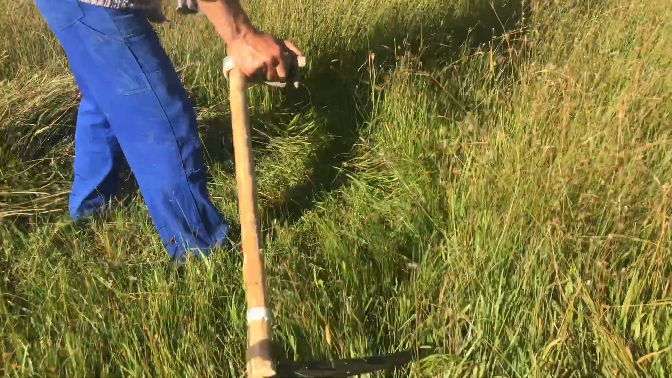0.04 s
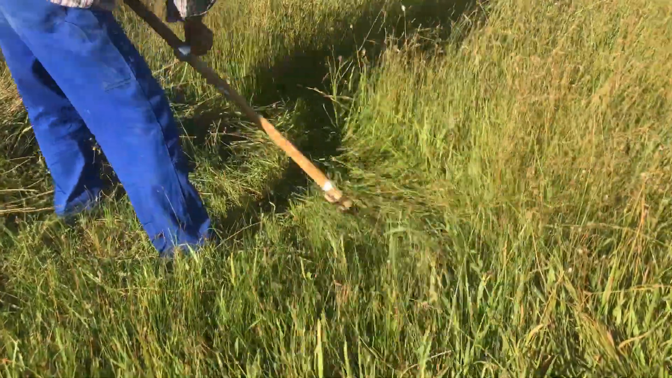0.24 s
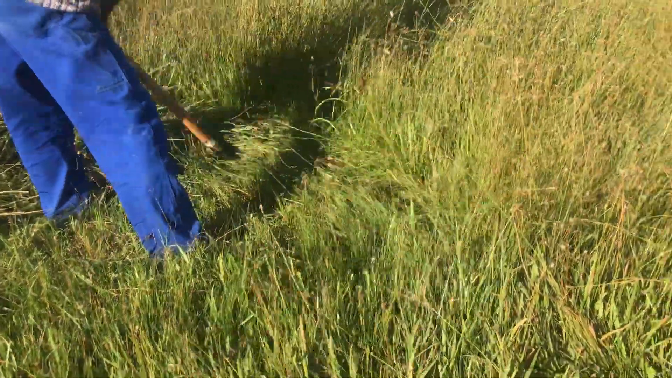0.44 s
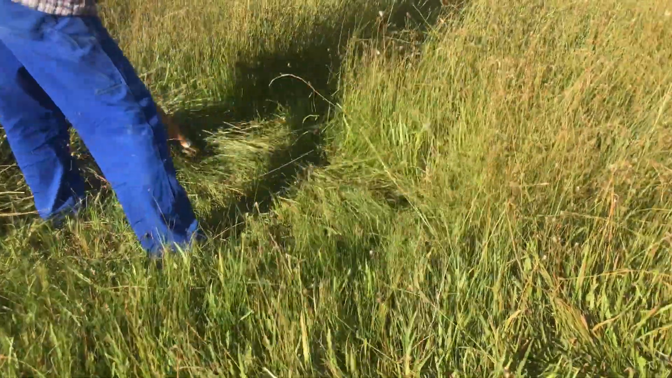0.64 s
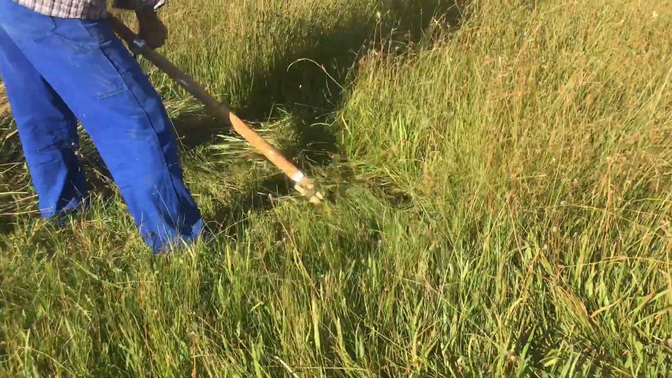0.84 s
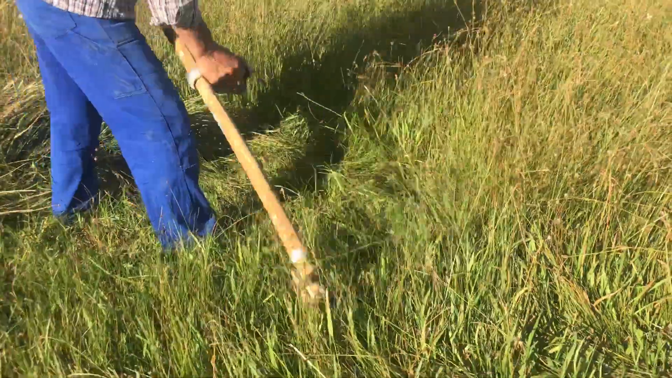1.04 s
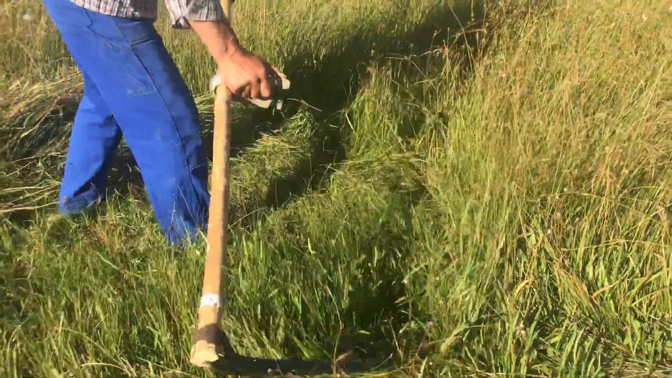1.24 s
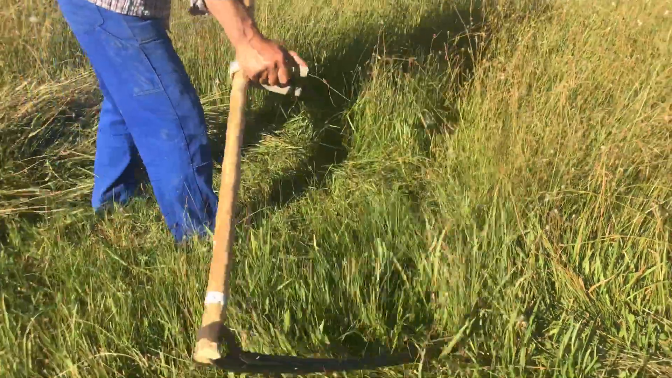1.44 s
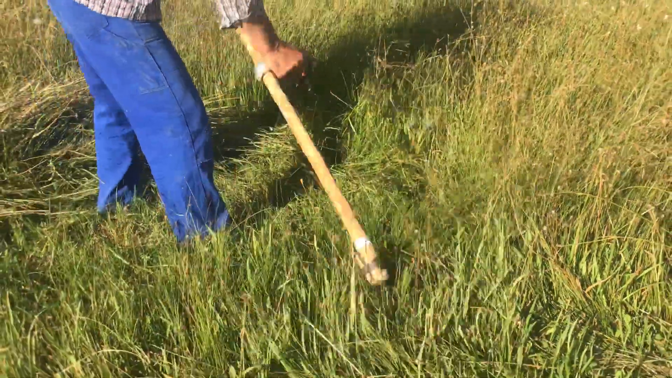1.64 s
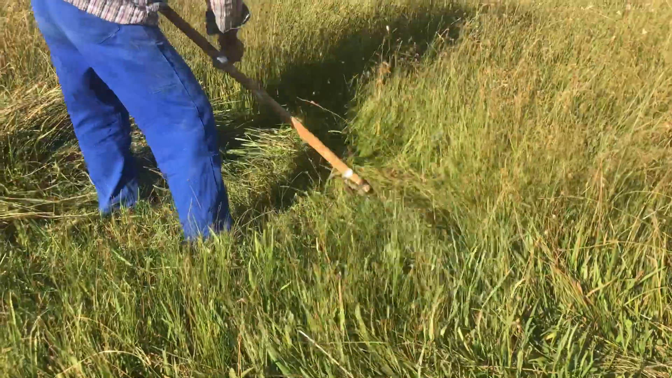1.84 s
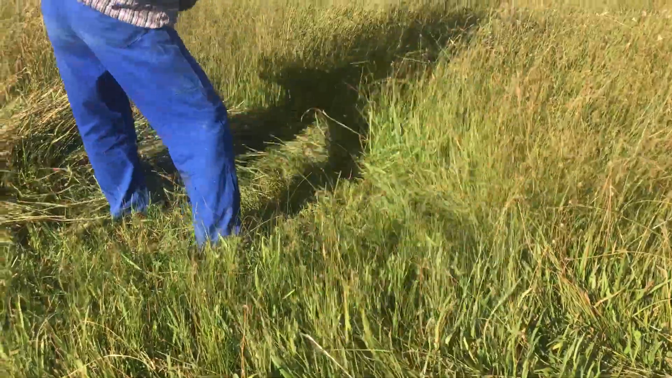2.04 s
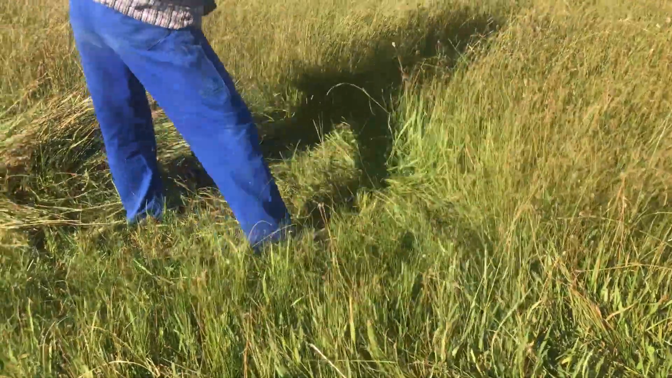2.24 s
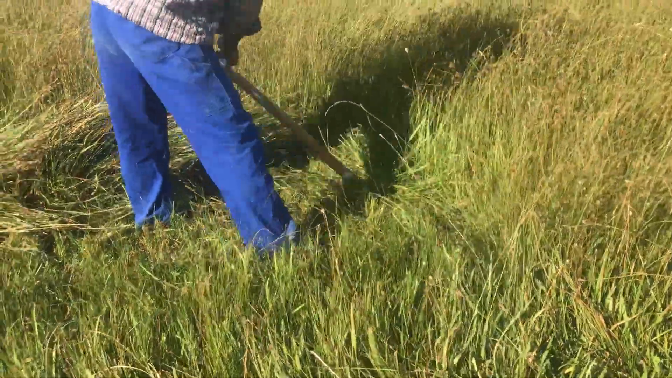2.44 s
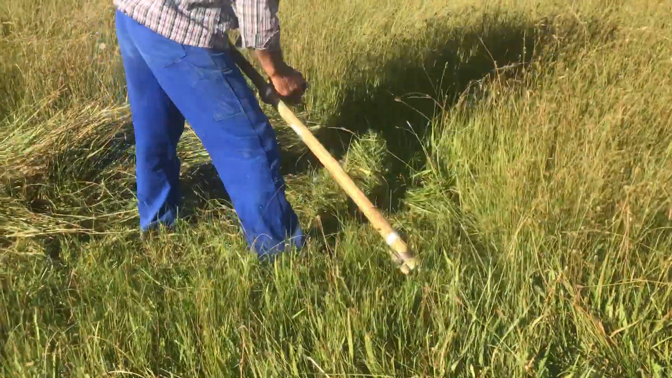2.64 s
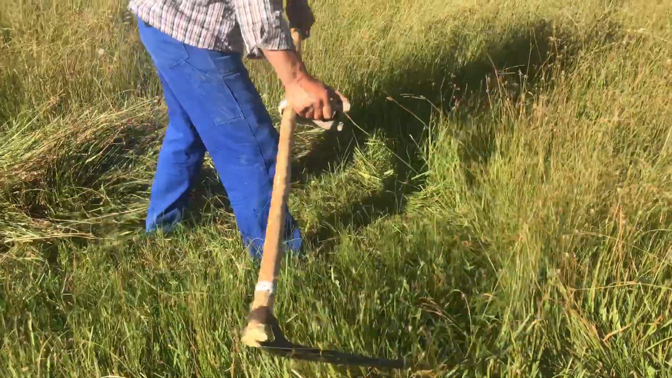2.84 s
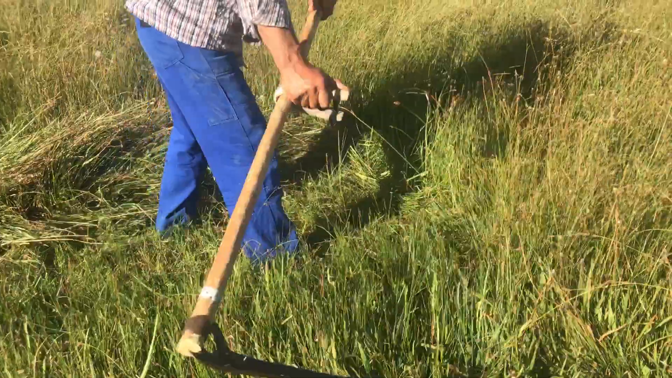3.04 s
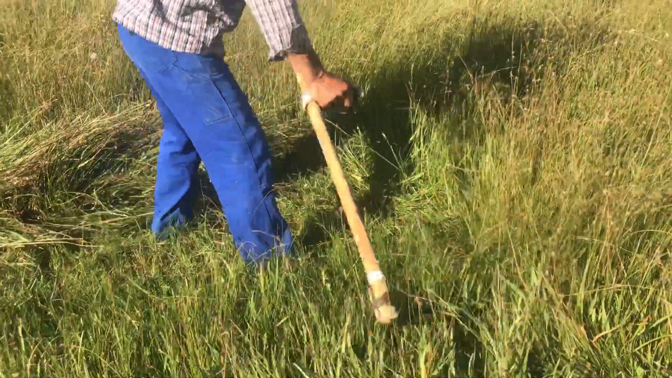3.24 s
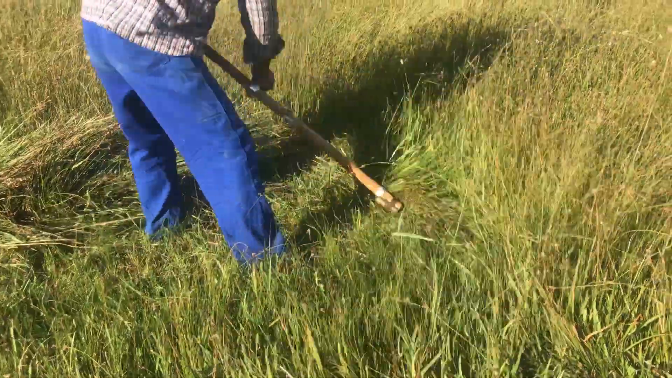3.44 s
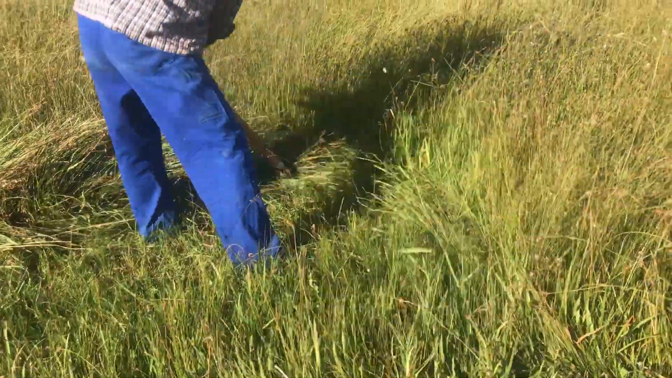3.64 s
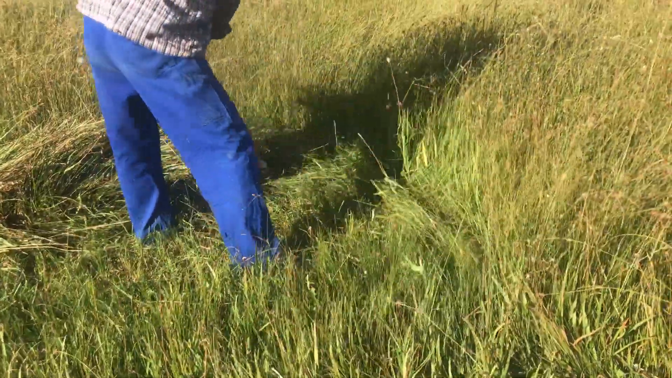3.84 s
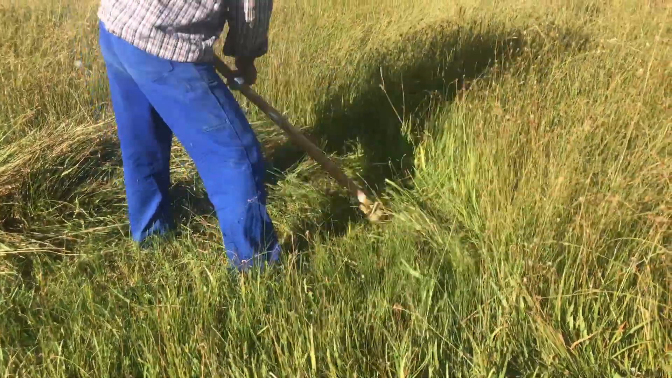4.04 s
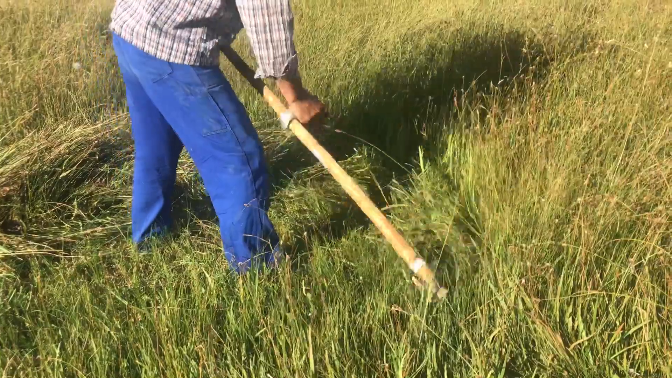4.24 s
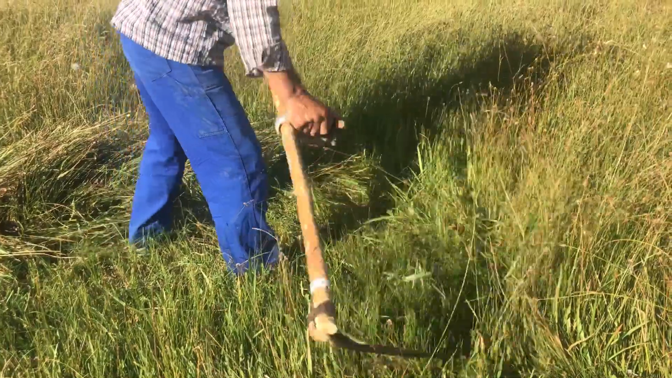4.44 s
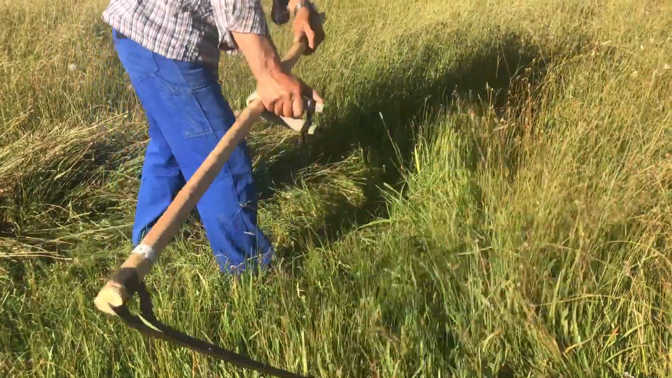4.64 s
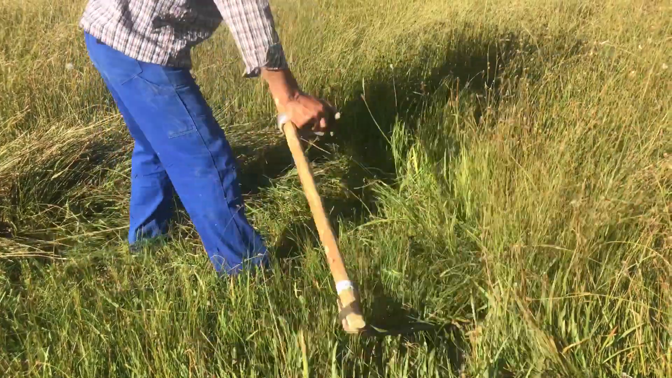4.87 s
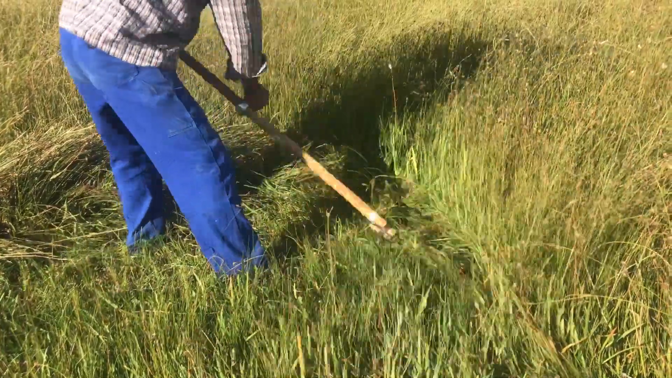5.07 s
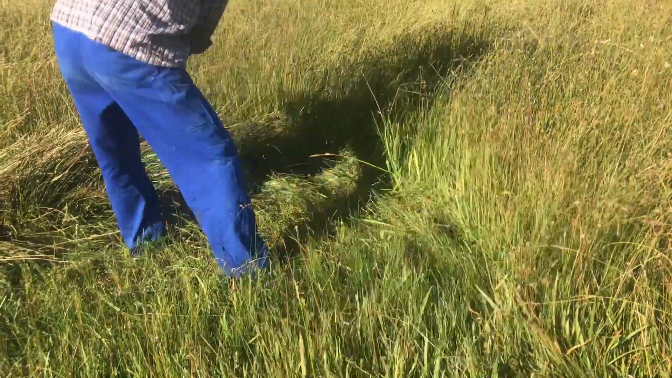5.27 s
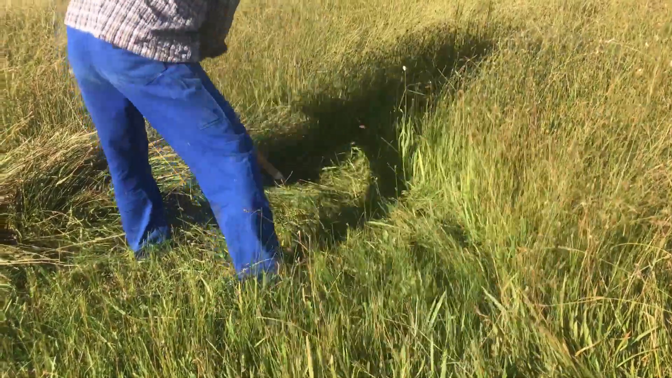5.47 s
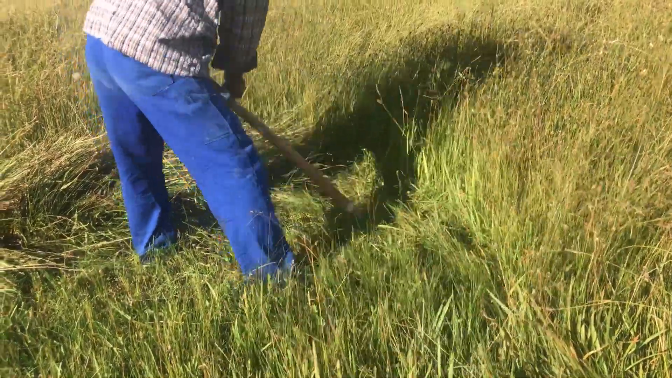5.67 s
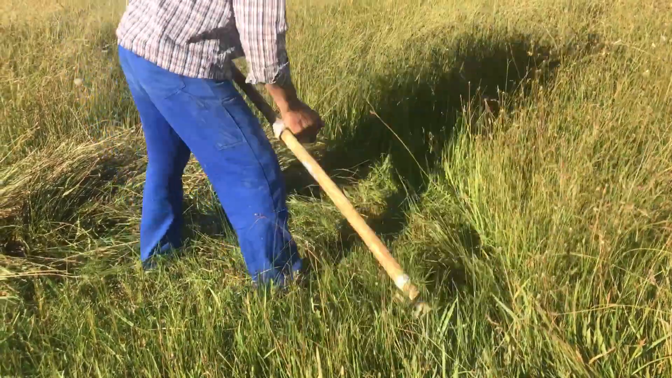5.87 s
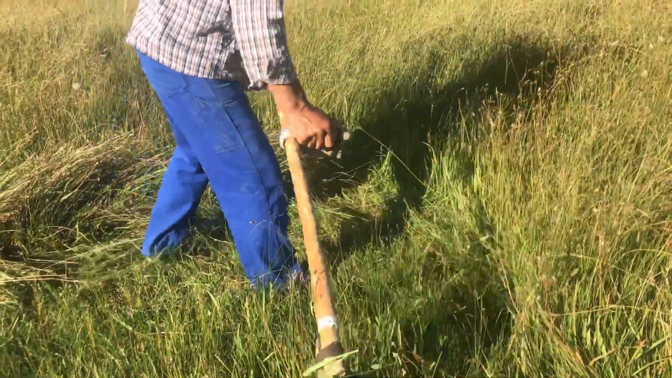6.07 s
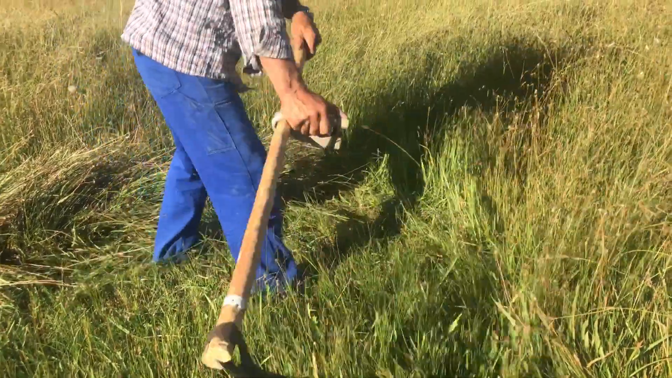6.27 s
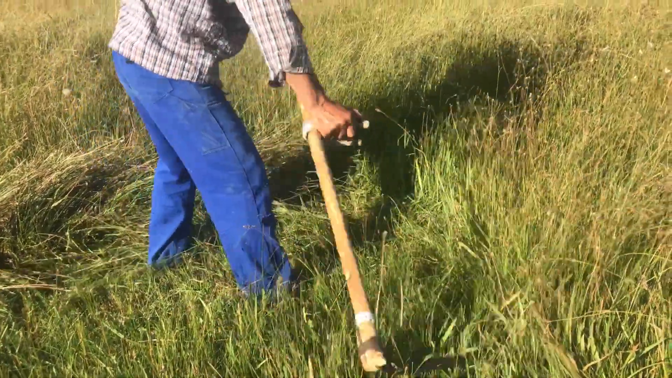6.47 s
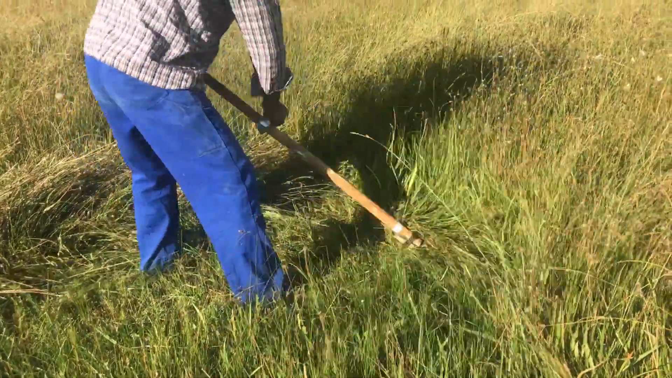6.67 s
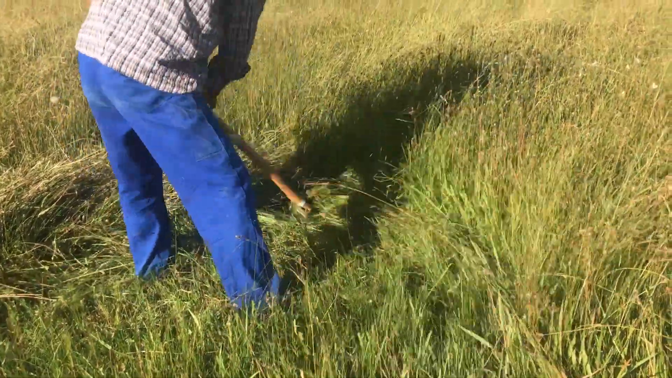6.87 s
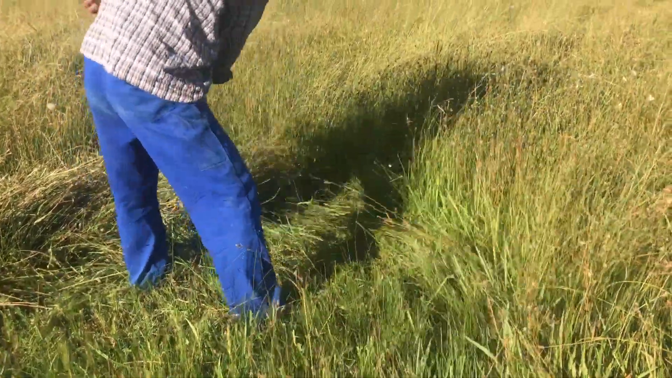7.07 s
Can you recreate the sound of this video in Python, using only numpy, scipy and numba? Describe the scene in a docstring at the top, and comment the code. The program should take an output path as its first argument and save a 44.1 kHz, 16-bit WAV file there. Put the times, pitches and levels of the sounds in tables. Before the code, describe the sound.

Steady scythe strokes rip through thick grass, each a short bright crunching hiss with a steely edge, over faint rumbling wind in an open field.

```python
"""A mower swings a scythe through tall meadow grass: the edge sings briefly, then the first of five cuts bites.
In each cut, random clicks and short tones are the stalks that snap on the edge and ring the thin blade;
leaf hiss starts with the bite and outlasts it, a band of clicks slides highest where the swing is fastest,
and a low drone comes just after the fastest moment.
Between cuts the blade drags back over the stubble in softer flicks, with odd cracks and light brushes.
Throughout, filtered noise and low tones are wind buffeting one microphone in an open field without echoes."""
import sys
import numpy as np
from scipy import signal
from scipy.fft import rfft, irfft
from scipy.io import wavfile
from scipy.ndimage import uniform_filter1d
from numba import njit

SR = 44100
rng = np.random.default_rng(int(sys.argv[2]) if len(sys.argv) > 2 else 0)


def digitize_waveform(pressure):
    """Quantize a signal to 16-bit integers and store it at the path in sys.argv[1].

    Rows of a 2-D input are taken as channels; values are limited to [-1, 1].
    """
    field = np.atleast_2d(pressure).T
    bounded = np.clip(field, -1, 1)
    quanta = np.round(bounded * 32767).astype(np.int16)
    wavfile.write(sys.argv[1], SR, quanta)


N = 313551
T = np.arange(N) / SR
FREQS = np.arange(N // 2 + 1) * SR / N

# thick and thin patches the edge crosses: centre_s, crunch_db, half_length_s
PATCHES = [(.265, 4, 0.017), (1.789, -2.5, 0.013), (3.41, -0.5, 0.02), (3.445, 5.5, 0.0082),
           (5.047, 1.5, 0.01), (5.088, -5, .033), (6.637, 4.5, 0.046)]
# cut spectrum: freq_hz, gain_db
CUT_COLOUR = [(100, 1.5), (300, -2), (480, 0.5), (780, 0.5), (1500, -2.5), (2700, -4.5), (3400, -0.5),
              (4400, -3), (6500, -4), (9000, -7), (12000, -8.5), (16000, -9.5)]
SAG_DB_PER_S = 7.5  # the blade slows as it gathers grass
# component levels are against the crunch; attack and release are multiples of the cut's
TEAR_DB, TEAR_SAG_DB_PER_S, TEAR_ATTACK, TEAR_RELEASE = -10.5, 27.5, 1.9, 0.76
HISS_DB, HISS_ATTACK, HISS_RELEASE = -3, 0.95, 0.71
HISS_MUFFLE_DB = -3.5  # by the heaped swath
HISS_LEAD_S = 0.01  # the edge meets leaves before stalks
SLIDE_DB, SLIDE_HZ, SLIDE_WIDTH_HZ = -9.5, 3760, 2200
SLICE_DB, SLICE_SPEED_DB = 1, 7.5  # slow edge; rise at full speed


def cuts(blade):
    """The edge severs tuft after tuft; the harder it bites, the more stalks snap each second."""
    bite = stroke(SAG_DB_PER_S)
    patch_db = sum(db * swell(s, half_s) for s, db, half_s in PATCHES)
    speed, edge_hz, load = swing()

    rate = 20000 * (bite / amp(-40.5)) ** 0.3
    stalks = snaps(rate, spread_db=1.5) + amp(-4.5) * stems(1800, cycles=81.4, spread_db=2.6)
    slicing = sweep(snaps(rate, spread_db=-2.5), edge_hz, 2600.0)
    ring = filtered(snaps(rate, spread_db=1.0), blade)
    slicing_gain = amp(SLICE_DB + SLICE_SPEED_DB * speed)
    severing = filtered(stalks + slicing_gain * slicing + amp(3.0) * ring, colour(CUT_COLOUR))

    above_low, above_high = above(1450), above(7650)
    tear_band = unit(filtered(severing, 1 - above_low))
    crunch_band = unit(filtered(severing, above_low - above_high))
    hiss_band = unit(filtered(severing, above_high))

    # thick stalks part in clumps, only while the edge is deep in the grass
    tufts = walk(90)
    tear_gain = stroke(TEAR_SAG_DB_PER_S, TEAR_ATTACK, TEAR_RELEASE)
    tear = tear_gain * amp(TEAR_DB + patch_db + 1.9 * tufts) * tear_band
    crunch = bite * amp(-1.07 + patch_db + 1.1 * tufts) * crunch_band

    # fine leaves hiss evenly, on while the swath falls
    hiss_gain = stroke(SAG_DB_PER_S, HISS_ATTACK, HISS_RELEASE, HISS_LEAD_S)
    hiss = hiss_gain * amp(HISS_DB + HISS_MUFFLE_DB * load + 0.48 * patch_db) * hiss_band

    # going in and coming out, stalks slide along the flat of the blade
    flat = unit(filtered(rng.standard_normal(N), resonance(SLIDE_HZ, SLIDE_WIDTH_HZ) ** 2))
    slide = bite * (1 - speed) * amp(SLIDE_DB + patch_db + tufts) * flat

    # the loaded blade slides on the turf and drones in its lowest mode
    lowest_mode = unit(filtered(rng.standard_normal(N), resonance(576, 71) ** 2))
    drone = bite * amp(-19.0) * load * lowest_mode
    return tear + crunch + hiss + slide + drone


# cuts: full_bite_s, standing_grass_s, level_db, attack_db_per_s, release_db_per_s, fastest_s
CUTS = [(0.139, 0.16, -40, 133, 113, .222), (1.693, 0.2, -42.5, 128, 98, 1.78),
        (3.279, .215, -42.5, 152, 91.5, 3.39), (4.906, .296, -43.5, 282, 140, 5.045),
        (6.542, 0.23, -43.4, 162, 103, 6.65)]


def stroke(sag_db_per_s, attack=1, release=1, lead_s=0):
    """Gain of all cuts: the edge enters, slows in the standing grass and runs out."""
    gain = 0
    for s, length_s, db, attack_db_per_s, release_db_per_s, _ in CUTS:
        age_s = T - s
        entering_db = attack * attack_db_per_s * np.maximum(-age_s - lead_s, 0)
        leaving_db = release * release_db_per_s * np.maximum(age_s - length_s, 0)
        sag_db = sag_db_per_s * np.clip(age_s, 0, length_s)
        gain = gain + amp(db - entering_db - sag_db - leaving_db)
    return gain


def swing(entry_hz=3200, fast_hz=7200, exit_hz=4000, fast_s=0.068, heap_lag_s=0.11, heap_s=0.072):
    """Speed of the slicing edge, its pitch, and the moment when the blade carries the swath away."""
    speed = sum(swell(fastest_s, fast_s) for *_, fastest_s in CUTS)
    load = sum(swell(fastest_s + heap_lag_s, heap_s) for *_, fastest_s in CUTS)
    edge_hz = entry_hz + (fast_hz - entry_hz) * speed + (exit_hz - entry_hz) * load
    return speed, edge_hz, load


# blade modes, damped by the grass: freq_hz, width_hz, gain_db
BLADE = [(551, 230, -2), (1148, 23, 1), (1458, 98, -2), (1957, 34, 1.5), (2150, 130, -2), (2380, 270, -1),
         (2883, 66, 3), (3192, 57, 5), (3550, 13, 7), (3660, 28, 2), (3920, 39, 4), (4080, 43, -5),
         (4364, 220, 2.5), (4644, 93, 6.5), (5340, 67, -5), (6040, 37, 3), (7000, 90, -14),
         (8180, 440, -5.5)]


def blade_response():
    """The steel blade rings as a sum of damped modes."""
    return sum(amp(db) * resonance(hz, width_hz) for hz, width_hz, db in BLADE)


# backswings over the stubble: fastest_s, level_db, rise_db_per_s, fall_db_per_s
BACKSWINGS = [(1.14, -57.5, 61, 51), (2.735, -61, 22, 25.5), (4.327, -59.5, 30, 33),
              (5.977, -60.2, 20, 22.5)]
# grass brushed as the mower turns the swing and shifts his feet:
# centre_s, level_db, half_length_s, treble_relative_db
BRUSHES = [(0.812, -64, 0.096, 0.5), (1, -70, .07, 11), (1.34, -68.5, .056, 6), (1.485, -68, 0.084, 0),
           (2.375, -65.5, 0.15, -.5), (2.816, -62.5, .022, 5), (4.02, -66.4, 0.14, 1),
           (4.703, -65, 0.037, -4.5), (5.62, -64.7, .124, 1), (6.403, -57.5, .014, -4)]
# stubble spectrum: freq_hz, gain_db
STUBBLE_COLOUR = [(200, 2), (600, -7), (1500, -7.5), (2700, -5.5), (3500, 0), (5000, -4), (7000, -1),
                  (9000, -2.5), (12000, -2.5), (16000, -5)]
# treble against rustle at the fastest moment; treble dB per dB of rustle
STUBBLE_HISS_DB, STUBBLE_HISS_GROWTH = 4, 1.41


def backswings(blade):
    """The back of the blade brushes the stubble: lighter, softer flicks, brighter with speed."""
    flicks = snaps(9000, spread_db=-0.3) + 1.04 * rng.standard_normal(N)
    flicks += stems(2200, cycles=92, spread_db=2.7)
    ring = filtered(snaps(9000, spread_db=-0.3), blade)
    stubble = amp(0.5 * walk(40)) * filtered(flicks + amp(6.0) * ring, colour(STUBBLE_COLOUR))

    rustle = hiss = 0
    for s, db, rise_db_per_s, fall_db_per_s in BACKSWINGS:
        slow_db = np.minimum(rise_db_per_s * (T - s), fall_db_per_s * (s - T))
        moving = np.exp(-np.abs((T - s) / 0.365) ** 8)  # the blade rests at both turning points
        rustle = rustle + moving * amp(db + slow_db)
        hiss = hiss + moving * amp(db + STUBBLE_HISS_DB + STUBBLE_HISS_GROWTH * slow_db)

    brush = sum(amp(db) * swell(s, half_s) for s, db, half_s, _ in BRUSHES)
    brush_hiss = sum(amp(db + treble_db) * swell(s, half_s) for s, db, half_s, treble_db in BRUSHES)
    high = above(5400)
    body = np.hypot(rustle, brush) * unit(filtered(stubble, 1 - high))
    treble = np.hypot(hiss, brush_hiss) * unit(filtered(stubble, high))
    return body + treble


# single stiff stalks and tussocks that crack or knock the blade:
# start_s, level_db, centre_hz, decay_s, ring_gain
STALKS = [(.258, -37.5, 3970, 0.011, .5), (1.095, -46.5, 7800, 0.0049, .3), (1.138, -51, 5860, 0.016, 0.73),
          (2.047, -48, 9000, .002, .1), (2.707, -47, 7000, .003, .4), (4.166, -49, 5500, 0.0021, .6),
          (4.193, -58, 2030, 0.012, 0.2), (4.225, -46, 6900, 0.0023, .4), (4.335, -51, 8950, .008, .3),
          (4.464, -54.5, 600, .005, .3), (4.904, -36, 3200, 0.0033, 0.97),
          (4.937, -34.5, 3600, 0.0061, 0.71), (6.219, -54, 490, 0.0062, 0.3),
          (6.256, -49.5, 3850, 0.0013, .6), (6.336, -50.5, 537, 0.0056, .8)]


def stiff_stalks(blade):
    """Each is a short crack of band-passed noise with a little ring of steel."""
    out = np.zeros(N)
    noise = rng.standard_normal(N)
    steel = unit(filtered(noise, blade))
    for s, db, hz, decay_s, ring_gain in STALKS:
        start = int(s * SR)
        part = slice(start, start + SR // 10)
        band = signal.butter(1, [hz / 1.06, min(hz * 1.09, SR / 2.5)], "band", fs=SR)
        crack = unit(signal.lfilter(*band, noise[part] + ring_gain * steel[part]))
        age_s = T[:len(crack)]
        # the stalk bends before it gives, so the crack takes a moment to rise
        rise = 1 - np.exp(-age_s / (0.057 * decay_s))
        out[part] += amp(db) * crack * np.exp(-age_s / decay_s) * rise
    return out


# the edge catches and one blade mode sings: centre_s, level_db, freq_hz, half_length_s
ZINGS = [(0.082, -53.5, 1990, 0.013), (3.229, -49, 3330, 0.012), (4.93, -53, 2035, 0.03),
         (6.519, -45, 3190, 0.0058)]


def zings():
    """A short stick-slip squeal swells and dies in a single mode."""
    out = 0
    for s, db, hz, half_s in ZINGS:
        squeal = np.sqrt(2) * np.sin(2 * np.pi * hz * T + 0.66 * walk(180))
        out = out + amp(db) * swell(s, half_s) * squeal
    return out


# gusts on the microphone: centre_s, level_db, half_length_s
GUSTS = [(0.023, -54, 0.089), (0.527, -50.5, 0.024), (1.047, -52.5, 0.14), (1.685, -47, 0.03),
         (2.68, -56.5, .1), (3.023, -53.5, 0.2), (3.304, -48, .05), (3.667, -51, 0.27), (4.225, -43.5, 0.2),
         (4.578, -44.5, 0.096), (5.327, -47, 0.35), (5.905, -44.5, 0.18), (6.243, -42, 0.032),
         (6.489, -43.5, 0.13), (6.843, -41.5, 0.19)]
# sharp buffets: centre_s, level_db, eddy_hz, half_length_s, flutter_relative_db
BUFFETS = [(0.676, -40.5, 64, 0.014, -30), (0.829, -41.5, 66, 0.015, -21), (2.58, -43.5, 96, 0.019, -4.5),
           (2.735, -49, 120, 0.015, -1), (3.06, -49, 128, 0.014, 4.5), (4.086, -37.5, 65.3, 0.018, -8),
           (4.186, -32.5, 75.4, 0.017, -22.5), (4.596, -43.5, 118, 0.022, -5.5),
           (5.25, -48, 139.5, 0.024, -7), (5.431, -39, 77, 0.0051, -35), (5.494, -41, 73, 0.013, -32),
           (5.986, -39, 93, 0.021, 4), (6.492, -41, 93, 0.0036, -27), (6.857, -32.5, 75, 0.0072, -8.5)]
# wind spectrum: freq_hz, gain_db
WIND_COLOUR = [(15, -55), (28, -28), (40, 4), (57, 8.5), (85, 2), (120, -6), (170, -24), (250, -39),
               (400, -51), (800, -70), (2000, -93)]
BREEZE_DB = -62  # between the gusts


def wind():
    """Eddies rumble on the microphone; stronger gusts shed smaller, higher ones."""
    gust_power = sum((amp(db) * swell(s, half_s)) ** 2 for s, db, half_s in GUSTS)
    gust_db = 10 * np.log10(amp(BREEZE_DB) ** 2 + gust_power)

    rumble = unit(filtered(rng.standard_normal(N), colour(WIND_COLOUR)))
    # the flow keeps a fairly even strength within a gust, apart from short puffs
    rumble /= np.sqrt(uniform_filter1d(rumble ** 2, SR // 14) + 0.011)
    puffs = amp(3.2 * walk(18))

    flutter_band = resonance(140, 108) ** 2 * (1 - above(530, order=4))
    flutter = unit(filtered(rng.standard_normal(N), flutter_band))
    flutter_gain = amp(-7 + (gust_db + 41))
    out = amp(gust_db) * puffs * (rumble + flutter_gain * flutter)

    for s, db, hz, half_s, flutter_db in BUFFETS:
        eddy = np.sqrt(2) * np.sin(2 * np.pi * (hz * (T - s) + rng.random()))
        out += amp(db) * swell(s, half_s) * (eddy + amp(flutter_db) * flutter)
    return out


# meadow spectrum: freq_hz, gain_db
FIELD_COLOUR = [(20, 5.5), (50, 5), (130, 5.5), (250, 2), (550, -4), (900, -9.5), (2000, -14), (5000, -15),
                (16000, -29.5)]
FIELD_DB = -64


def field():
    """The faint, slowly swelling hush of the open meadow is coloured noise."""
    hush = unit(filtered(rng.standard_normal(N), colour(FIELD_COLOUR)))
    return amp(FIELD_DB + 0.2 * walk(1.35)) * hush


def snaps(rate, spread_db):
    """Random clicks of uneven size, rate per second, at constant power."""
    chance = np.clip(rate / SR, 0.02, 1)
    size = amp(spread_db * np.minimum(rng.exponential(size=N), 4))
    hit = rng.random(N) < chance
    return unit(hit * rng.standard_normal(N) * size / np.sqrt(chance))


def stems(rate, cycles, spread_db, count=40000):
    """Stems that scrape along the steel, rate per second, each at its own pitch for some cycles."""
    when, pitch, strength = rng.random((count, 3))[:int(rate * N / SR)].T
    hz = 900 + 14000 * pitch ** 1.5
    size = amp(spread_db * -np.log(0.03 + 0.97 * strength)) * hz ** 0.6
    start = (when * N).astype(np.int64)
    return unit(grains(start, 2 * np.pi * hz / SR, cycles * SR / hz, size))


@njit
def grains(start, turn, length, size):
    """Short tones that swell and fade (start sample, radians per sample, samples, size)."""
    out = np.zeros(N)
    for k in range(len(start)):
        for i in range(min(N - start[k], int(length[k]))):
            fade = np.sin(np.pi * i / length[k]) ** 2
            out[start[k] + i] += size[k] * fade * np.sin(turn[k] * i)
    return out


@njit
def sweep(x, hz, width_hz):
    """State-variable band-pass with a moving centre."""
    y, band, low = np.empty(len(x)), 0., 0.
    for i in range(len(x)):
        g, k = np.tan(np.pi * hz[i] / SR), width_hz / hz[i]
        v = (band + g * (x[i] - low)) / (1 + g * (g + k))
        band, low, y[i] = 2 * v - band, low + 2 * g * v, k * v
    return y


def swell(s, half_s):
    """A smooth rise and fall around one moment."""
    return np.exp(-((T - s) / half_s) ** 2)


def walk(rate_hz):
    """Smooth chance with a spread near 1."""
    k = max(int(SR / rate_hz), 1)
    steps = np.repeat(rng.standard_normal(N // k + 1), k)
    return 1.14 * uniform_filter1d(steps, k)[:N]


def amp(db):
    """Decibels to gain."""
    return 10 ** (np.asarray(db) / 20)


def unit(x):
    """Scale to rms 1."""
    return x / np.sqrt(np.mean(x ** 2))


def filtered(x, response):
    """Apply a frequency response."""
    return irfft(rfft(x) * response, N)


def colour(points):
    """Response through (freq_hz, gain_db) points."""
    hz, db = np.transpose(points)
    return amp(np.interp(np.log(FREQS + 1), np.log(hz), db))


def resonance(hz, width_hz):
    """Response of one damped mode, gain 1 at its centre."""
    damping = 1j * FREQS * width_hz
    return damping / (hz ** 2 - FREQS ** 2 + damping)


def above(hz, order=6):
    """Share of each frequency that lies above a crossover; a higher order is steeper."""
    return 1 - 1 / (1 + (FREQS / hz) ** order)


def scene():
    """Everything reaches one microphone, alike in both channels."""
    blade = blade_response()
    mower = cuts(blade) + backswings(blade) + stiff_stalks(blade) + zings()
    mono = mower + wind() + field()
    return np.array([mono, mono])


# dips in the microphone's response: freq_hz, width_hz, gain_db
MIC_DIPS = [(2700, 520, 0), (4760, 215, -6), (7680, 550, -2), (10410, 410, -4.5)]
TOP_HZ = 15850


def record(dry):
    """The microphone's housing carves a few dips; the top is cut off."""
    dips_db = sum(db * np.exp(-((FREQS - hz) / width_hz) ** 2) for hz, width_hz, db in MIC_DIPS)
    return filtered(dry, amp(dips_db) * (1 - above(TOP_HZ, order=300)))


dry = scene()
out = record(dry)
digitize_waveform(out)
```